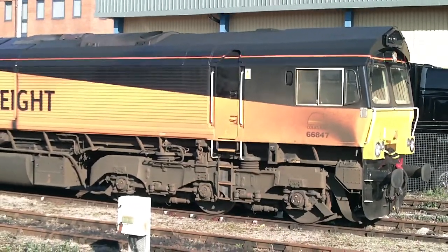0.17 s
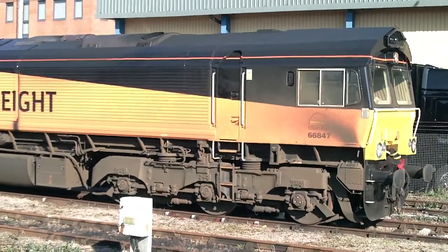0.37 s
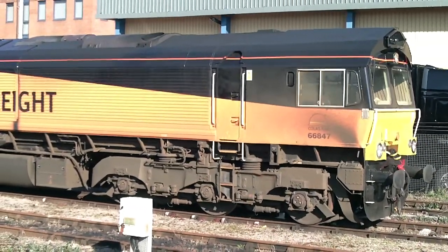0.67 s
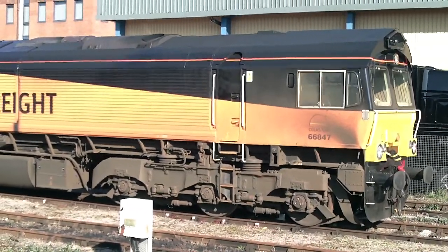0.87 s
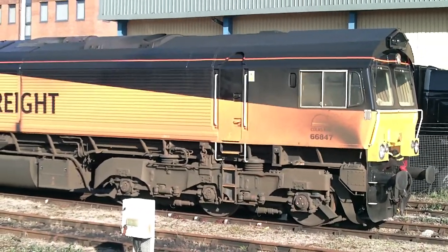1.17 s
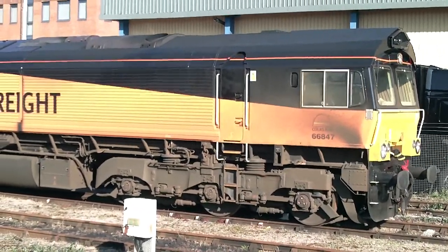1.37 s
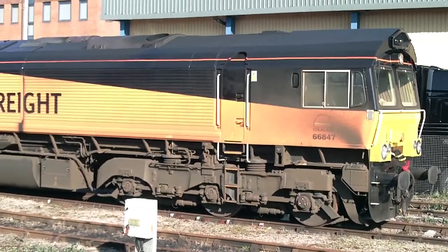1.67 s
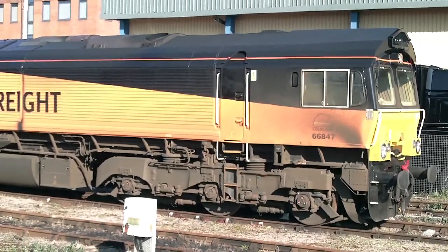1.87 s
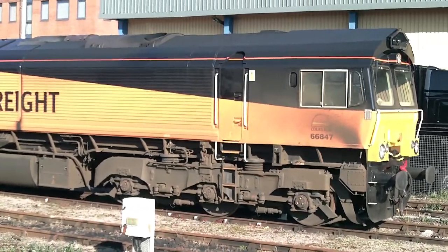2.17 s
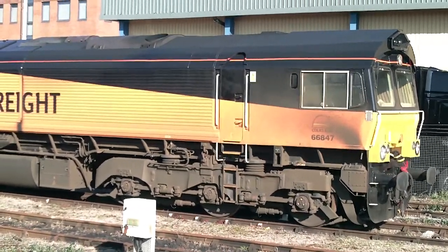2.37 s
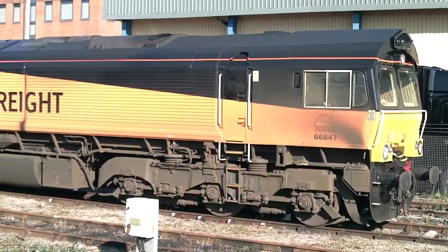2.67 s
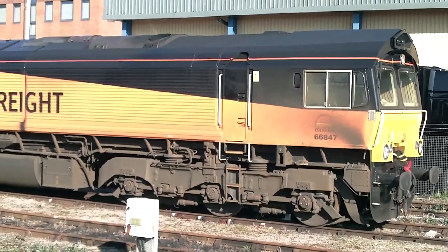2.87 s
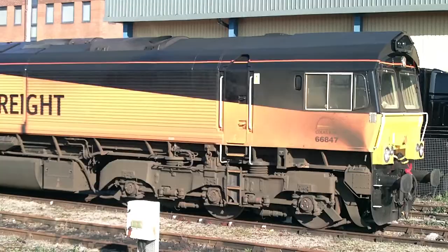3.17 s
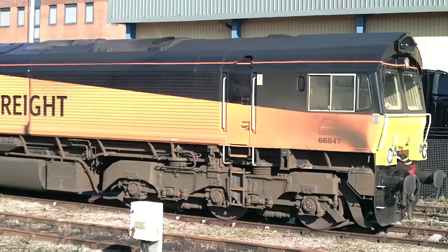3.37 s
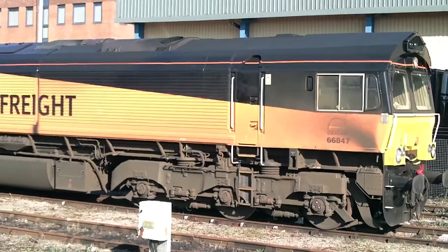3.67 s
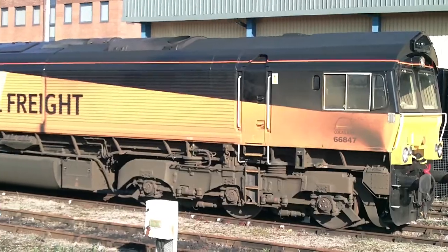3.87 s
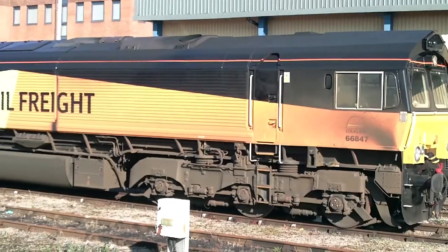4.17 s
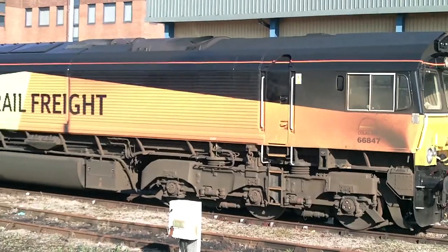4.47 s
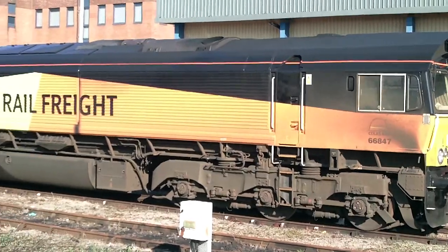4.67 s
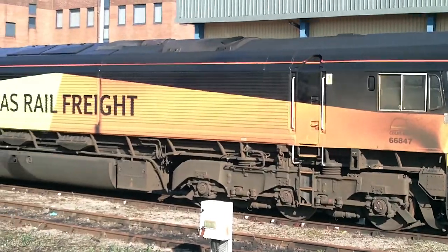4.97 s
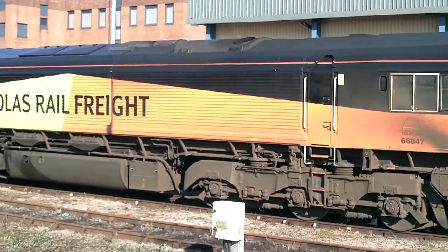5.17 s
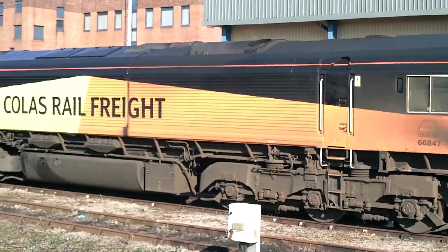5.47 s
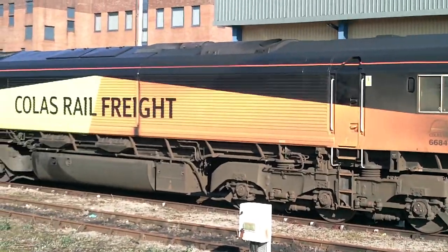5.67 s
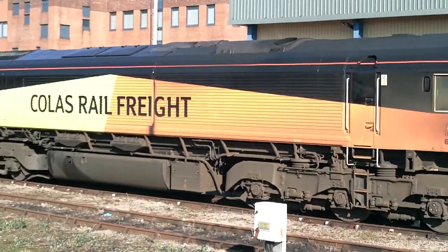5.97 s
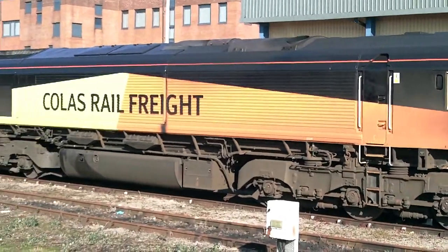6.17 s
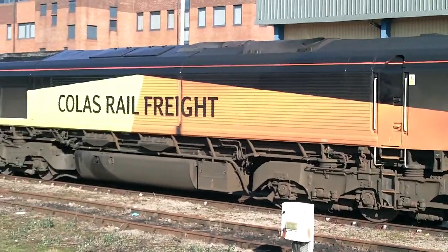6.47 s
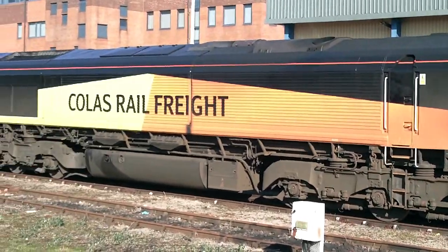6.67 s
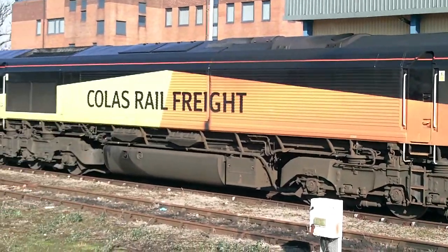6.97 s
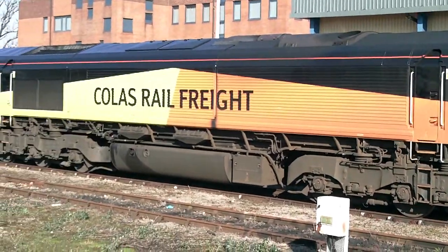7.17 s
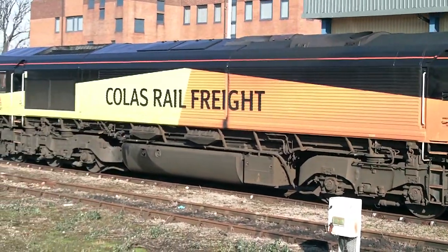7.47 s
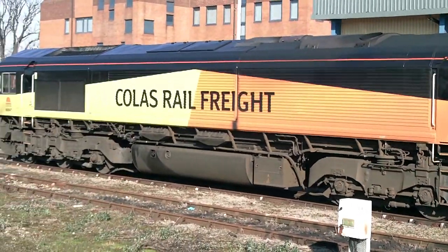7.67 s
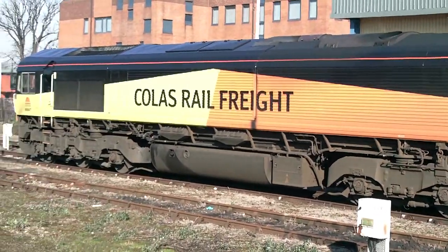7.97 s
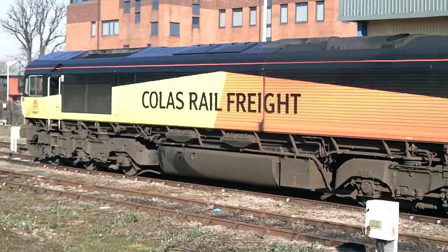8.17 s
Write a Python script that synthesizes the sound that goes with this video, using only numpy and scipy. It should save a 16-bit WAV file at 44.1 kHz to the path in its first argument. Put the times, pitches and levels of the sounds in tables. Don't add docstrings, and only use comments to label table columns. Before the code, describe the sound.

From 0 to about 8.3 seconds a heavy diesel locomotive idles without a break in an open rail yard. A deep, chugging exhaust beat repeats nearly six times a second, with low rumble beneath it swelling slowly. Hard, rapid valve knocks ring the engine block in the middle range, joined by gear hum, whirring shafts and resonant panels that pulse with each turn. Above sits a fuzzy, fluttering blower whine around 5.4 kilohertz, briefly rising near 5.7 seconds. A very short, faint air leak comes at the start; at about 0.5 seconds a sharp air blast bursts out, its bright hiss falling into a rougher roar and vanishing by about 1.5 seconds. Barely audible thin motor glides rise and fall near 4 and 6.8 seconds. The microphone is near, in stereo, and the treble dulls slightly late on. The idle cuts off still running.

```python
import sys
import numpy as np
from scipy import signal
from scipy.fft import rfft, irfft, next_fast_len
from scipy.io import wavfile

SR = 44100
rng = np.random.default_rng(int(sys.argv[2]) if len(sys.argv) > 2 else 0)


def generate_wav(sig):
    pcm = np.round(np.clip(np.atleast_2d(sig).T, -1, 1) * 32767).astype(np.int16)
    wavfile.write(sys.argv[1], SR, pcm)


def gain_from_decibels(decibels):
    exponent = np.asarray(decibels, float) / 20
    return 10 ** exponent


N = 367794


def rms_one(x):
    return x / np.sqrt(np.mean(x ** 2) + 1e-20)


def in_time(rows):
    s, *columns = np.transpose(rows)
    now = np.arange(N) / SR
    curves = [np.interp(now, s, column) for column in columns]
    return curves + [(now >= s[0]) & (now <= s[-1])]


def at_hz(points, size):
    hz = np.maximum(np.arange(size // 2 + 1) * SR / size, 1)
    table_hz, table_db = np.array(points).T[:2]
    return np.interp(np.log(hz), np.log(np.maximum(table_hz, 1)), table_db)


def drift(rate):
    r = np.exp(-80 * np.pi * rate / SR)
    chance = rng.standard_normal(N // 40 + 2002)
    slow = signal.lfilter([1], [1, -2 * r, r * r], chance)[2000:]
    return np.interp(np.arange(N) / 40, np.arange(len(slow)), rms_one(slow - slow.mean()))


def band(x, low_hz, high_hz):
    return signal.sosfiltfilt(signal.butter(6, [low_hz, high_hz], "band", fs=SR, output="sos"), x)


def fuzz(width_hz):
    slow = signal.butter(2, width_hz, fs=SR, output="sos")
    eddies = signal.sosfilt(slow, rng.standard_normal(N) + 1j * rng.standard_normal(N))
    return eddies / np.std(eddies)


def sung(hz, width_hz):
    peak = signal.iirpeak(hz, hz / width_hz, SR)
    once = signal.lfilter(*peak, rng.standard_normal(N))
    return rms_one(signal.lfilter(*peak, once))


# pitch_hz, side_minus_mid_db
STEREO_WIDTH = [(20, -30), (200, -30), (690, -26), (1270, -18), (2340, -14.5), (4300, -12), (6500, -10),
                (8500, -7), (14600, -7)]


def noise(spectrum, wide_db):
    size = next_fast_len(N)
    chance = rfft(rng.standard_normal((2, size)))
    mid, side = chance * gain_from_decibels(at_hz(spectrum, size)) * np.sqrt(SR / 2)
    side = side * gain_from_decibels(at_hz(STEREO_WIDTH, size) + wide_db)
    return irfft(np.array([mid + side, mid - side]), size)[:, :N]


TURNS_PER_S = 5.7158
# time_s, crank_lead_ms
GOVERNOR = [(0, -.27), (.4, -.06), (.8, -.37), (1.2, -1.3), (1.6, -1.9), (2.4, -2.48), (3.8, -2.91),
            (4.8, -2.9), (6.4, -2.66), (8.34, -2.02)]


def turns():
    return TURNS_PER_S * (np.arange(N) / SR + in_time(GOVERNOR)[0] / 1000)


def load():
    peak_deg = 100
    return np.cos(2 * np.pi * (turns() - peak_deg / 360))


def looped(contacts, modes, uneven_db, slack_ms):
    degrees, blow = np.transpose(contacts)
    run_in = round(SR / TURNS_PER_S)
    due = np.arange(-1, 49)[:, None] + degrees / 360
    chance = rng.standard_normal((2,) + due.shape)
    on_time = np.interp(due, np.r_[-1, turns()], np.r_[0, run_in + np.arange(N)])
    at = np.round(on_time + chance[0] * slack_ms * SR / 1000).astype(int)
    clicks = np.full(N + run_in + 1, 1e-18)
    np.add.at(clicks, np.clip(at, 0, N + run_in), blow * gain_from_decibels(uneven_db * chance[1]))
    clicks[-1] = 0
    out = 0
    for hz, share, t60 in modes:
        r, w = gain_from_decibels(-60 / (t60 * SR)), 2 * np.pi * hz / SR
        out = out + signal.lfilter([0, share * np.sin(w)], [1, -2 * r * np.cos(w), r * r], clicks)
    return out[run_in:-1]


EXHAUST_PUFFS = [(0.0, -0.132), (9.9, -0.232), (28.1, -0.087), (37.3, -0.198), (49.8, 0.055), (56.5, 0.15),
                 (98.8, -0.21), (104.0, 0.108), (109.3, -0.169), (121.0, 0.18), (132.4, 0.118),
                 (143.7, -0.212), (153.4, 0.148), (189.0, -0.178), (225.7, 0.049), (240.6, -0.077),
                 (246.4, 0.144), (256.8, 0.19), (268.1, -0.215), (278.0, -0.137), (291.7, 0.187),
                 (302.4, -0.073), (312.7, 0.105), (319.4, 0.133)]
# pitch_hz, share, t60_s
STACK_MODES = [(35.5, -0.77, 0.151), (50.5, 1.0, 0.099), (99.1, 0.64, 0.093), (137.8, 0.1, 0.2),
               (184.5, 0.4, 0.2), (236.5, -0.56, 0.012), (266.4, 0.45, 0.068), (328.6, 0.14, 0.2)]


def exhaust():
    beat = band(looped(EXHAUST_PUFFS, STACK_MODES, uneven_db=.5, slack_ms=.03), low_hz=14, high_hz=366)
    return gain_from_decibels(-0.5 + 0.42 * drift(0.66)) * beat


VALVE_KNOCKS = [(4.5, 0.009), (19.0, 0.007), (28.8, -0.006), (34.0, 0.012), (45.4, -0.009), (59.6, 0.011),
                (66.7, -0.009), (73.0, 0.007), (79.2, -0.019), (92.4, -0.013), (98.7, 0.015),
                (110.6, -0.007), (128.4, -0.016), (140.8, -0.02), (147.9, -0.011), (158.1, 0.009),
                (166.4, -0.008), (176.9, 0.015), (187.5, -0.008), (218.2, 0.012), (222.0, -0.011),
                (241.9, 0.009), (246.3, 0.009), (259.3, 0.022), (268.4, -0.01), (274.0, 0.008),
                (292.0, 0.007), (321.1, 0.018), (329.5, 0.009), (358.0, -0.012)]
# pitch_hz, share, t60_s
BLOCK_MODES = [(379.9, -2.41, 0.089), (423.6, 15.38, 0.012), (555.7, 1.1, 0.2), (626.5, 12.29, 0.068),
               (665.6, 1.0, 0.2), (727.2, -9.09, 0.043), (820.3, 1.12, 0.159), (905.0, -0.88, 0.173),
               (964.3, -0.08, 0.2)]


def valve_gear():
    knock = band(looped(VALVE_KNOCKS, BLOCK_MODES, uneven_db=.5, slack_ms=.015), low_hz=366, high_hz=1040)
    return gain_from_decibels(-0.4 + 0.23 * drift(1.0)) * knock


# multiple, level_db, swell_with_load_db
GEAR_MESH = [(1, -31.5, 3.5), (2, -48, 8), (3, -54.5, 3), (4, -52.5, 1.5), (5, -51, 4.5)]
# cycles_per_turn, level_db
DRIVEN_SHAFTS = [(17.75, -36), (42.38, -49), (72.05, -52), (81.72, -45), (84.75, -49), (163.41, -49),
                 (221.78, -56), (504.2, -58), (569.9, -59)]


def gears():
    crank, work = 2 * np.pi * turns(), load()
    twist = .6 * np.cos(crank - np.radians(260))
    mesh = 117.255 * crank + np.radians(160) + .1 * drift(3)
    out = gain_from_decibels(-47) * np.sin(200 * crank)
    for multiple, level_db, swell_db in GEAR_MESH:
        level = gain_from_decibels(level_db + swell_db * work + 0.61 * drift(9.2))
        out += level * np.sin(multiple * mesh + np.sqrt(multiple) * twist)
    hum = 0
    for ratio, level_db in DRIVEN_SHAFTS:
        hum = hum + gain_from_decibels(level_db) * np.sin(ratio * crank + 2 * np.pi * rng.random())
    out += gain_from_decibels(drift(1)) * hum
    squeak_per_turn, squeak_swing_rad = 515.94, 4.5
    swing = np.cos(crank - np.radians(70))
    glide = np.exp(1j * (squeak_per_turn * crank - squeak_swing_rad * swing))
    out += gain_from_decibels(-47.5 + 4.7 * swing) * np.real((.9 + .5 * fuzz(50)) * glide)
    return np.sqrt(2) * out


# time_s, pitch_hz
BLADE_TONE = [(0, 5370), (.7, 5352), (2.1, 5380), (4.6, 5365), (5.1, 5385), (5.72, 5445), (5.9, 5375),
              (8.34, 5375)]
# time_s, level_db
MIC_FACING = [(0, -0.5), (1.2, 0), (2.5, -1), (4.2, -1), (5.5, 0.5), (6.2, -2), (6.9, -1), (7.5, -1.5),
              (8.34, -2.5)]


def blower():
    phase = 2 * np.pi * np.cumsum(in_time(BLADE_TONE)[0] + 3 + 14 * drift(18)) / SR
    eddies = 0.65 + fuzz(51.0)
    tone = np.real(eddies * np.exp(1j * phase))
    octave = gain_from_decibels(-29.0) * np.abs(eddies) * np.cos(2 * phase + 2 * np.angle(eddies))
    return gain_from_decibels(-38.5 + 0.9 * in_time(MIC_FACING)[0]) * np.sqrt(2) * (tone + octave)


# start_s, opening_s, held_s, jet_db
VALVE_OPENINGS = [
    (.02, 0.056, .04, -42.5),
    (.493, 0.029, 0.055, -24.5),
]
# pitch_hz, level_db_per_hz
JET_COLOUR = [(600, -18), (1100, -5.5), (1700, -10), (2150, -10), (2550, -9), (3100, -10), (3700, -5),
              (4300, -5), (4950, -13.5), (5750, -10), (6200, -5.5), (6950, -1.5), (8240, -8.5),
              (10500, -12.5), (15000, -21.5)]
# pitch_hz, width_hz, level_against_jet_db
VALVE_PIPE = [(1100, 60, -15), (2330, 80, -14), (2590, 90, -11), (2790, 80, -12), (3050, 90, -11),
              (3220, 70, -14), (3660, 80, -12), (4200, 120, -13), (6150, 120, -13), (6750, 130, -12)]


def air_valve():
    jet = noise(JET_COLOUR, wide_db=1.0)
    jet = gain_from_decibels(-1.7) * jet / np.std(band(jet, low_hz=5900, high_hz=14000))
    jet = jet + sum(gain_from_decibels(level_db - 1.0) * sung(hz, width_hz) for hz, width_hz, level_db in VALVE_PIPE)
    roar, out = band(jet, low_hz=900, high_hz=3520), 0
    shut_db, fall_db_per_s = -22, (70, 39.5)
    for (start, opening, held, jet_db), fall in zip(VALVE_OPENINGS, fall_db_per_s):
        since = np.arange(N) / SR - start
        emptying = np.maximum(since - opening - held, 0)
        flow_db = jet_db + shut_db * np.clip(1 - since / opening, 0, 4) - fall * emptying
        roar_db = np.minimum(2 + 15 * emptying, 8)
        out = out + gain_from_decibels(flow_db) * (jet + (gain_from_decibels(roar_db) - 1) * roar)
    return out * gain_from_decibels(0.57 * drift(13))


# pitch_hz, width_hz, level_db, swell_with_load_db
SINGING_PANELS = [(1297, 25, -47.5, -2), (1351, 34, -40.5, 4), (1845, 90, -44.5, 1.5),
                  (2021, 115, -45.5, 0.5), (2633, 52, -55, 3.5), (3150, 18, -54, 4), (5740, 30, -72, 0.5),
                  (6000, 60, -68, 12), (7320, 150, -66, 2), (8750, 140, -68, 6)]


def panels():
    work, out = load(), 0
    for hz, width_hz, level_db, swell_db in SINGING_PANELS:
        out = out + gain_from_decibels(level_db + swell_db * work) * sung(hz, width_hz)
    return out


# start_s, length_s, rest_hz, rise_hz, level_db
LENS_GLIDES = [
    (3.85, .7, 10600, 1200, -68),
    (6.62, .5, 10700, 2250, -67.5),
]


def lens():
    out = 0
    for start, length, rest_hz, rise_hz, level_db in LENS_GLIDES:
        arch = np.sin(np.pi * np.clip((np.arange(N) / SR - start) / length, 0, 1))
        phase = 2 * np.pi * np.cumsum(rest_hz + rise_hz * arch) / SR
        out = out + np.minimum(3 * arch, 1) * gain_from_decibels(level_db) * np.real(fuzz(110) * np.exp(1j * phase))
    return out


# pitch_hz, level_db_per_hz
CASING_COLOUR = [(600, -10.5), (850, -4.5), (1100, -10.5), (1350, -7), (1620, -16), (1950, -12.5),
                 (2500, -16), (3300, -17.5), (5000, -24.5), (6100, -23), (7300, -32.5), (8700, -34),
                 (10200, -40.5), (12200, -39.5), (13300, -51.5), (14800, -45)]


def casing():
    hiss = noise(CASING_COLOUR, wide_db=2.0)
    hiss = hiss * gain_from_decibels(-29) / np.std(band(hiss, low_hz=853, high_hz=5000))
    facing_db = in_time(MIC_FACING)[0]
    throb = gain_from_decibels(0.35 * load() + 0.68 * drift(14)) - 1
    hiss = hiss + throb * band(hiss, low_hz=1070, high_hz=4150)
    treble = gain_from_decibels(-1.5 + facing_db + 0.51 * drift(12)) - 1
    hiss = hiss + treble * band(hiss, low_hz=5560, high_hz=16000)
    return gain_from_decibels(0.2 * facing_db - 2.62) * hiss


# pitch_hz, level_db_per_hz
RUMBLE_COLOUR = [(12, -70), (25, -50), (45, -41.5), (65, -43), (110, -54), (175, -55.5), (225, -57.5),
                 (370, -63), (500, -57.5), (660, -53.5), (800, -65), (1000, -64), (1300, -107),
                 (2500, -150)]


def rumble():
    return gain_from_decibels(1.43 * drift(0.85)) * noise(RUMBLE_COLOUR, wide_db=7.5)


def scene():
    opposite = np.array([[1], [-1]])
    near = exhaust() + valve_gear() + gears() + panels() + lens()
    wall = gain_from_decibels(-29) * np.roll(near, round(0.0052 * SR))
    whine = blower()
    whine_wall = gain_from_decibels(-14) * np.roll(whine, round(.021 * SR))
    tonal = near + whine + (wall + whine_wall) * opposite
    return tonal + air_valve() + casing() + rumble()


def band_limit(x):
    return signal.sosfilt(signal.butter(12, 15170, fs=SR, output="sos"), x)


# pitch_hz, left_minus_right_db
MIC_TILT = [(200, 1.0), (690, 1.05), (1270, 1.1), (2340, .8), (4300, 2), (7910, 1.5), (14600, -1.5)]


def record(dry):
    left_cut_hz, right_cut_hz, notch_hz = 45, 13, 7800
    size = next_fast_len(N)
    hz = 1j * np.arange(size // 2 + 1) * SR / size
    unlike = np.sqrt((hz + right_cut_hz) / (hz + left_cut_hz)) * gain_from_decibels(at_hz(MIC_TILT, size) / 2)
    x = irfft(rfft(dry, size) * [unlike, 1 / unlike], size)[:, :N]
    for sharpness in (12.0, 40.0):
        x = signal.lfilter(*signal.iirnotch(notch_hz, sharpness, SR), x)
    mix = 2.425 * np.tanh(x / 1.983)
    return band_limit(mix)


dry = scene()
out = record(dry)
generate_wav(out)
```